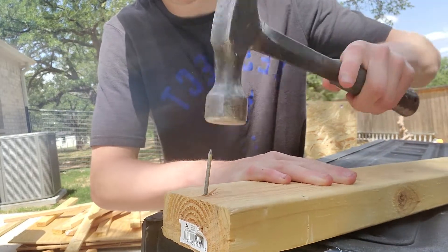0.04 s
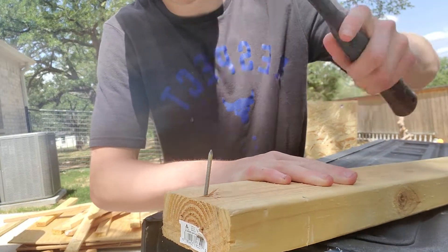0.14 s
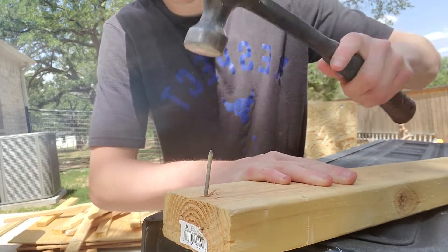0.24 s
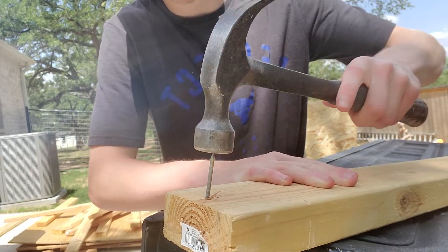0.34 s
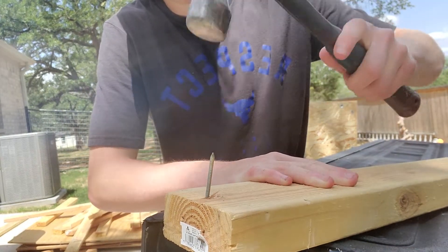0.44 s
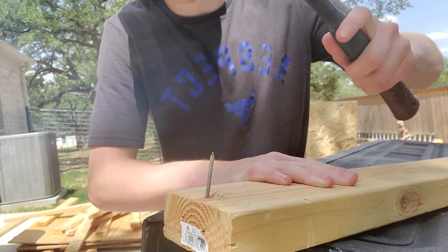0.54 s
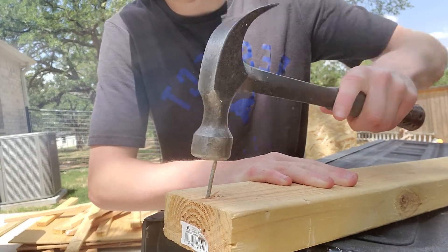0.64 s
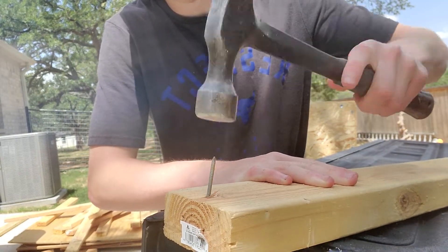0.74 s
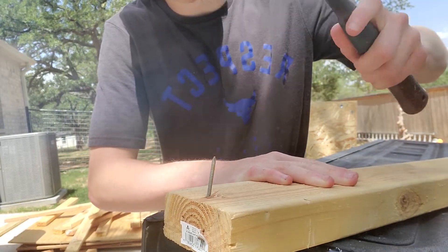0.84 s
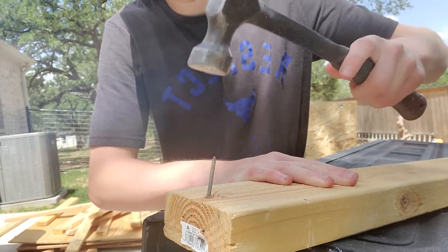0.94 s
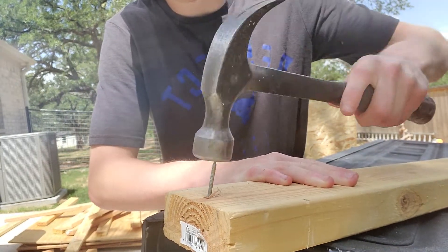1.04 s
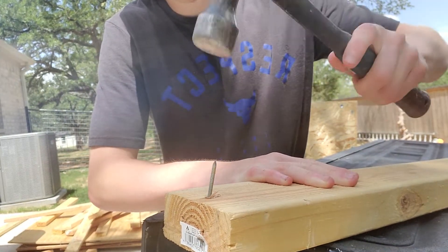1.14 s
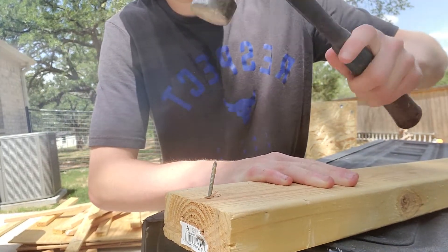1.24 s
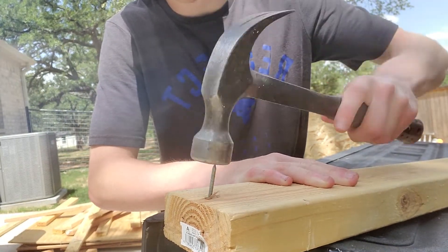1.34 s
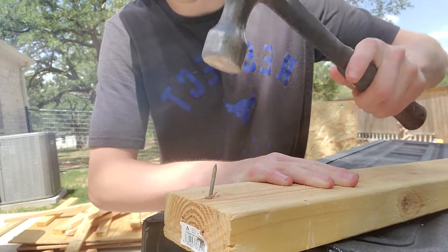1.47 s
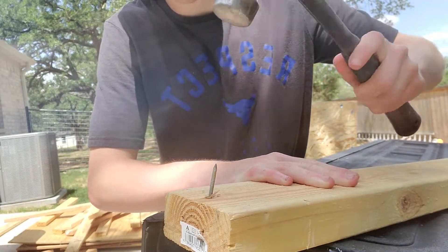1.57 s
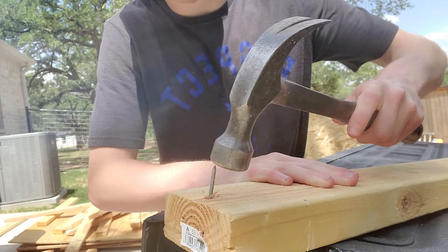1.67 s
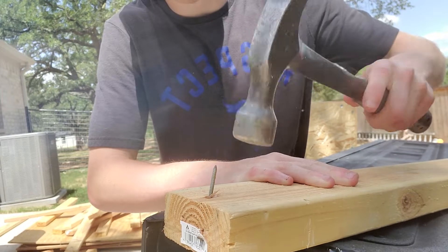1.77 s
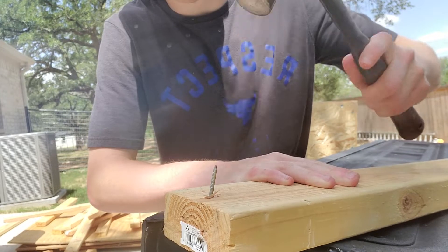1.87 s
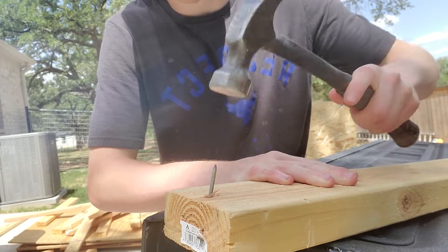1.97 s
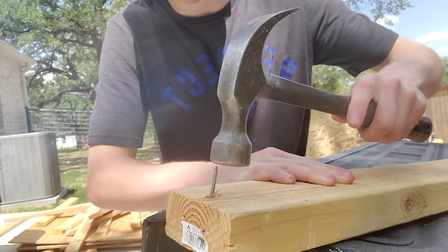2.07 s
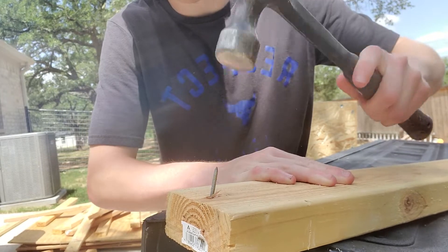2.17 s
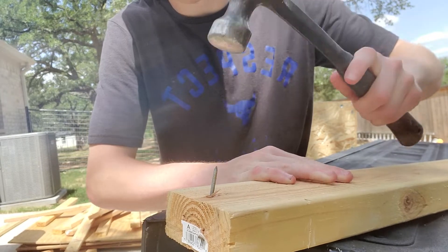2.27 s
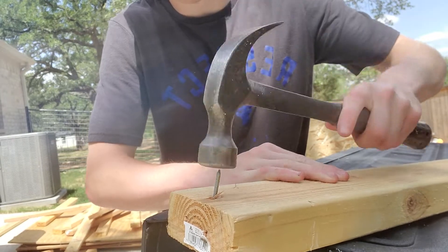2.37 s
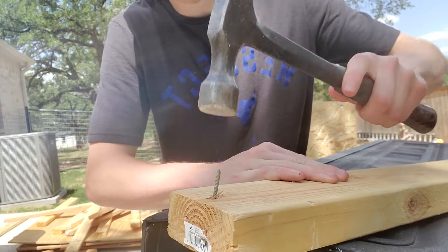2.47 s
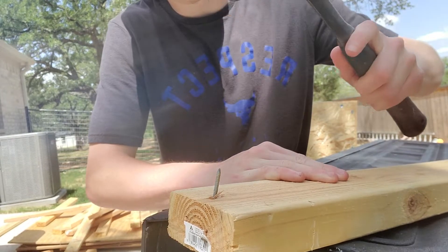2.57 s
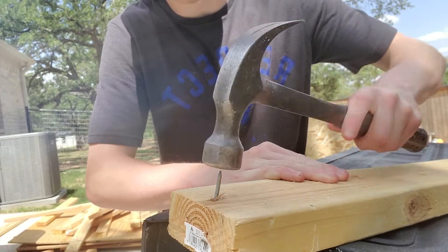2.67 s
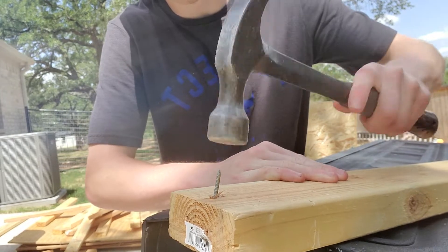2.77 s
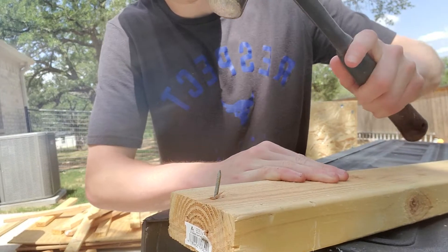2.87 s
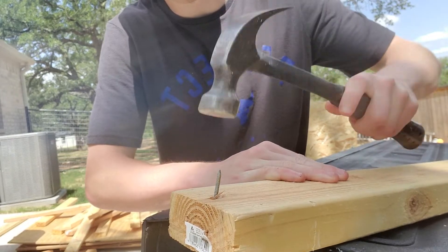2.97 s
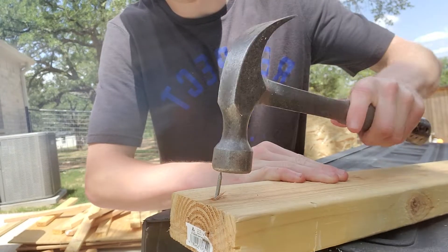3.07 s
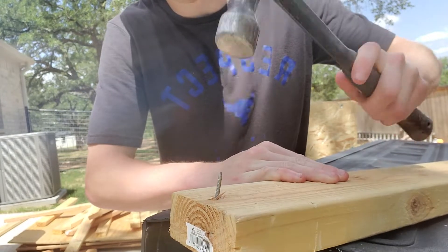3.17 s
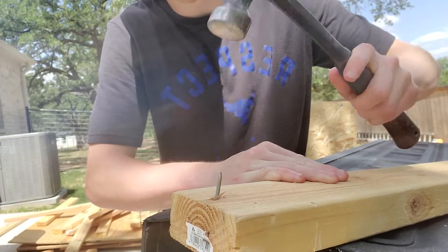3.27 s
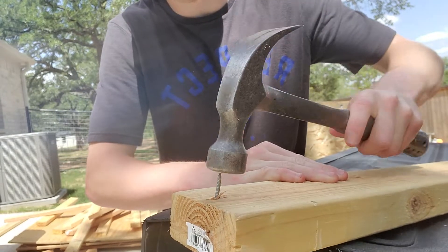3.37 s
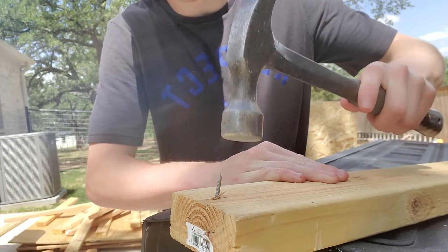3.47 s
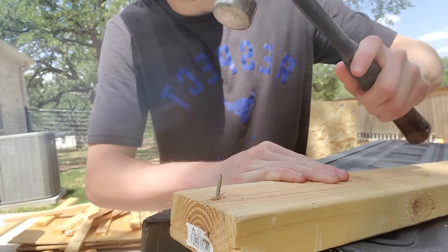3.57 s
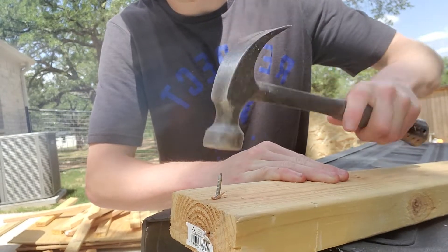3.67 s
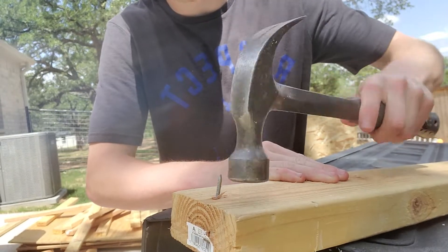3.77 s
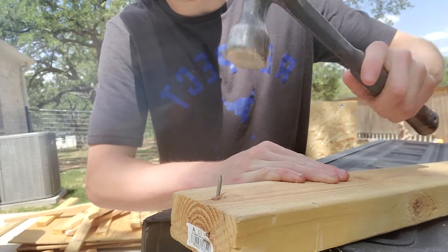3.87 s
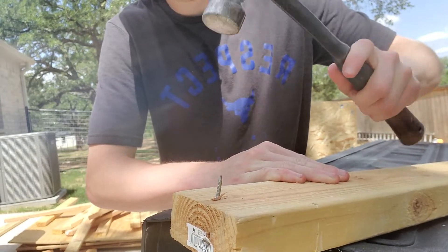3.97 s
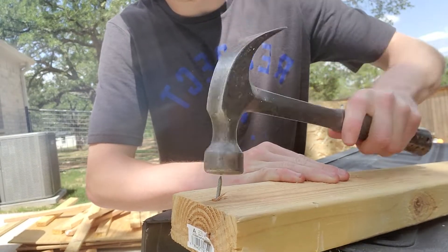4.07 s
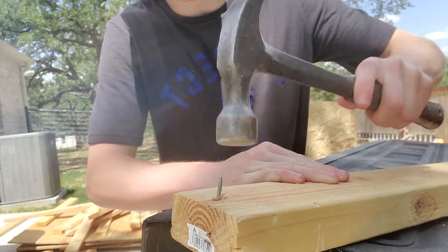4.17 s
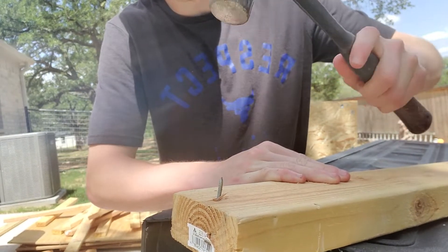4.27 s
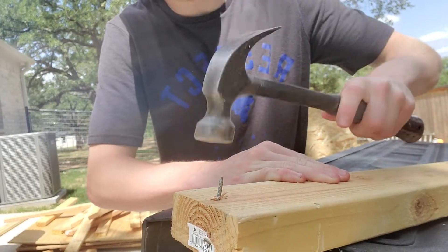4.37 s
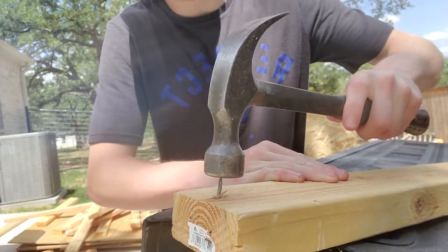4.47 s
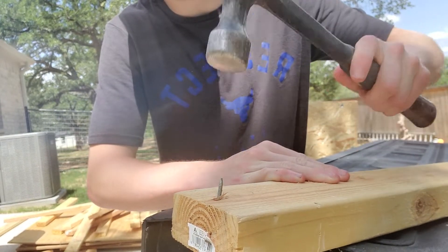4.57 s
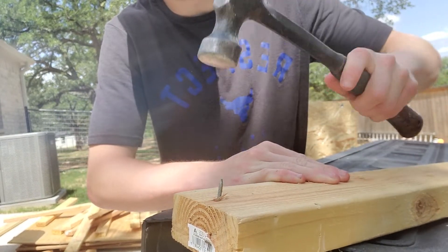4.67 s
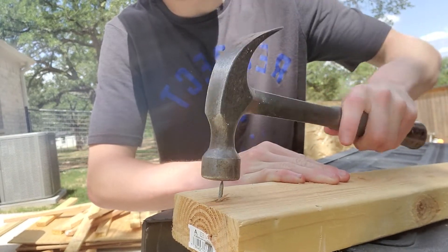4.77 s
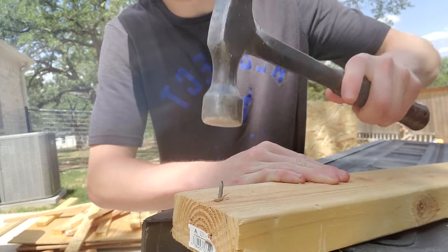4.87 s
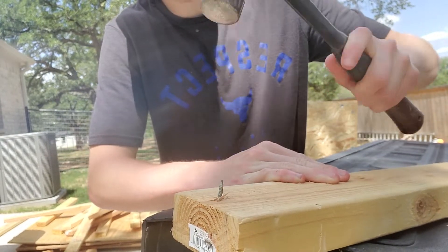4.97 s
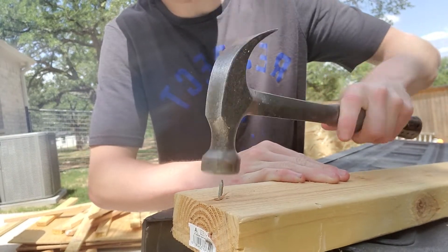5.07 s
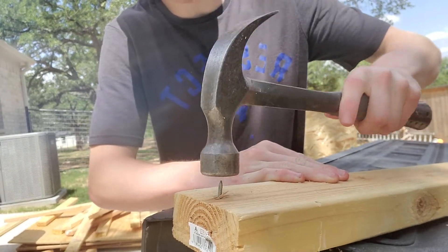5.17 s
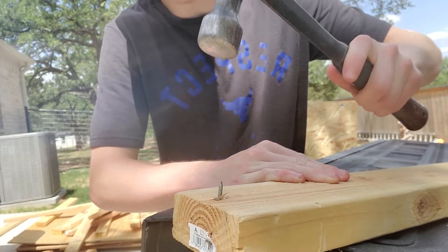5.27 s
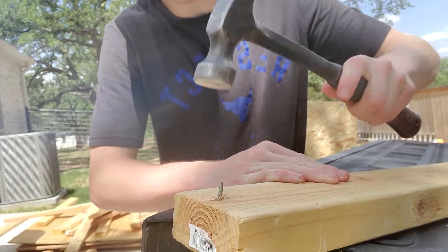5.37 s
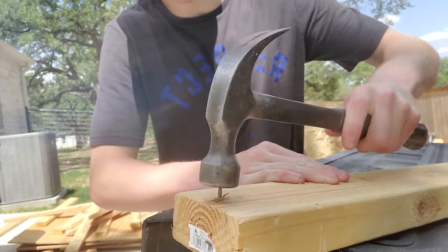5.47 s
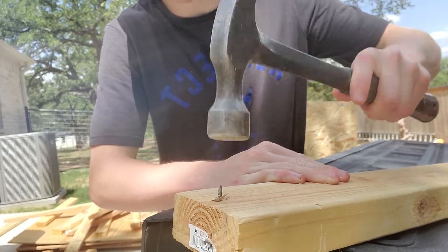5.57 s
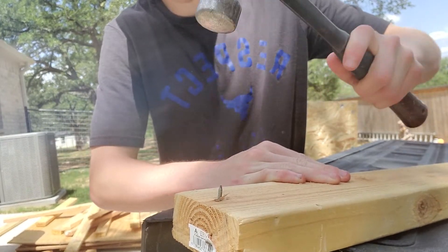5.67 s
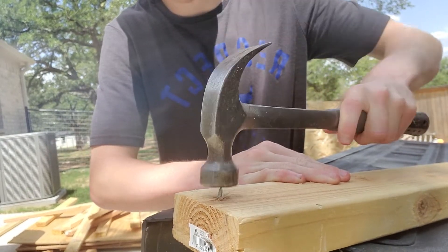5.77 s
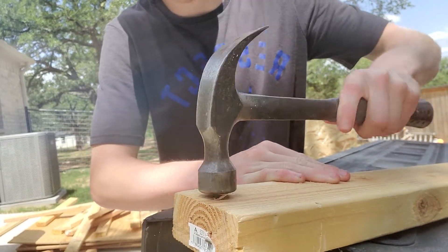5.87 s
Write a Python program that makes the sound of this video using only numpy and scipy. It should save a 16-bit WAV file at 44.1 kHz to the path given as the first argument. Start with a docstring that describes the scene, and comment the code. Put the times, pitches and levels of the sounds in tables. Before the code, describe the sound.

A steel hammer strikes a nail in a wooden board in steady, sharp blows, thumping a hollow plastic bin underneath, outdoors.

```python
"""A steel hammer drives a nail back out of a pine board in eighteen blows, close by in a yard.
Each blow clicks, cracks, pings the ever shorter nail and thumps the board. The board lies on a hollow
plastic bin, which shudders and booms. It settles with two small taps, and after many blows it hops
and clatters back onto the lid. Fence and house echo the work. Behind it an air conditioner hums
and leaves hiss, with a faint bird, an insect and one small tick."""
import sys
import numpy as np
from scipy import signal
from scipy.fft import rfft, irfft, next_fast_len
from scipy.io import wavfile
from scipy.ndimage import uniform_filter1d, minimum_filter1d

SR = 44100
rng = np.random.default_rng(int(sys.argv[2]) if len(sys.argv) > 2 else 0)


def generate_wav(sig):
    """Save sig (samples, or channels by samples) to the path in sys.argv[1] as 16-bit PCM at SR."""
    pcm = np.round(np.clip(np.atleast_2d(sig).T, -1, 1) * 32767).astype(np.int16)
    wavfile.write(sys.argv[1], SR, pcm)


N = 261513
RING = np.arange(SR) / SR  # one second of time for a sound to ring out

# The bright tone of a hard contact. Each row: frequency in Hz, level in dB.
CLICK_TONE = [(2000, -9), (5000, -18), (6800, -1), (7600, 3), (9400, 10.5), (10500, 5.5), (13000, 4),
              (15300, 0), (16500, -20)]


def amp(db):
    return 10 ** (np.asarray(db) / 20)


def value_at(points, hz):
    """Reads between the rows of a table that starts with a frequency column."""
    frequencies, values = np.transpose(points)
    return np.interp(np.log(hz + 1), np.log(frequencies), values)


def unit(x, seconds=None):
    """Scales a sound to an average (rms) level of 1, judged by its first seconds if given."""
    head = x if seconds is None else x[:max(8, int(seconds * SR))]
    return x / np.sqrt(np.mean(head ** 2) + 1e-20)


def add(mix, start, sound):
    part = mix[max(0, round(start * SR)):][:len(sound)]
    part += sound[:len(part)]


def colour(x, tone):
    """Shapes the tone of a sound. Each row of tone: frequency in Hz, gain in dB."""
    size = next_fast_len(len(x) + 2048)
    gain = amp(value_at(tone, np.fft.rfftfreq(size, 1 / SR)))
    return irfft(rfft(x, size) * gain, size)[:len(x)]


def noise(tone, size=SR):
    return unit(colour(rng.standard_normal(size), tone))


def dying(fade_s):
    """A fade that falls by 60 dB in fade_s seconds; every fade time here means this."""
    return amp(-60 * RING / fade_s)


def rising(seconds):
    return 1 - np.exp(-RING / seconds)


def resonate(x, hz, width_hz):
    """Makes a sound ring around one pitch; at 0 Hz it only smooths it."""
    pole = np.exp((2j * np.pi * hz - np.pi * width_hz) / SR)
    return signal.lfilter([1 - abs(pole)], [1, -pole], x + 1e-18).real


def waver(size, width_hz):
    return unit(resonate(rng.standard_normal(size), 0, width_hz))


def sine(pitch_hz):
    return np.sin(2 * np.pi * np.cumsum(pitch_hz) / SR)


def ring(notes, detune, spread_db, lag_s):
    """The natural notes of a struck thing; pitch, level and timing vary a little with each blow."""
    out = np.zeros(SR)
    for k, (hz, db, fade_s) in enumerate(notes):
        pitch, level, late = rng.standard_normal(3)
        t = np.maximum(RING - lag_s * abs(late), 0)
        wave = np.sin(2 * np.pi * hz * (1 + detune * pitch) * t)
        out += (-1) ** k * amp(db + spread_db * level) * dying(fade_s) * wave
    return out


def air():
    """Steady outdoor rumble and leaf hiss."""
    # Each row: frequency in Hz, level in dB.
    air_tone = [(15, -11), (25, -42.5), (74, 12.5), (134, 17), (157, 7.5), (200, -15.5), (242, -15),
                (911, -22.5), (2550, -24.5), (2760, -23.5), (3080, -25), (4370, -29), (5140, -37.5),
                (7310, -58.5), (16000, -115)]
    return amp(-40) * noise(air_tone, size=N)


def air_conditioner():
    """A slightly wavering hum over a low rumble."""
    hum = unit(sine(182.5 + 0.7 * waver(N, width_hz=2.86)))
    rumble = unit(resonate(rng.standard_normal(N), hz=62, width_hz=14))
    return amp(-43) * hum + amp(-46.5) * rumble


def steel_click():
    """Steel meets steel and rings briefly, while the board goes on faintly tapping the lid."""
    taps = (rng.random(SR) < 110 / SR) * rng.standard_normal(SR)  # about 110 a second
    chatter = unit(colour(taps, CLICK_TONE)) + 0.56 * noise(CLICK_TONE)
    snap = noise(CLICK_TONE) * (np.exp(-RING / 0.0017) + 1.8 * dying(0.027))
    return unit(snap + amp(-40.5) * chatter * dying(0.52), 0.062)


def wood_crack(click_db):
    """The nail slips for a few milliseconds and the wood rings; a soft hit with little click is duller."""
    # The noise of the slip. Each row: frequency in Hz, level in dB.
    crack_tone = [(200, -22.5), (600, 7.5), (1000, -10.5), (1500, 3.5), (2700, -1.5), (3200, 1), (4300, 1),
                  (5500, -7.5), (6500, -8), (7400, -24.5), (16000, -44)]
    # The ringing wood. Each row: pitch in Hz, level in dB, fade time in seconds.
    wood_notes = [(860, -2, 0.05), (1216, -3, 0.04), (1940, -10, .04), (2217, 1.5, 0.045), (2900, 1, 0.02),
                  (1130, -1, 0.05), (1389, -11, 0.09), (1640, -1, 0.06), (2690, -9, 0.04), (4200, -9, 0.03)]
    slip = np.exp(-(RING / 0.0044) ** 2) + amp(-27) * dying(0.05)
    crack = unit(noise(crack_tone) * slip * rising(0.0004), 0.029)
    wood = ring(wood_notes, detune=0.0051, spread_db=4, lag_s=0.00098)
    wood = unit(wood * rising(0.00065), 0.0037)
    treble_db = 0.86 * np.clip(click_db + 9, -11, 0)
    return colour(unit(amp(-2) * crack + wood, 0.04), [(2500, 0), (3900, treble_db)])


def board_thump():
    """The board and the lid under it take up the push and ring low."""
    # Each row: pitch in Hz, level in dB, fade time in seconds.
    board_notes = [(162, -9, 0.65), (182.3, -14, 0.41), (200.5, 3, 0.31), (233.3, -7.5, 0.45),
                   (254.9, -12.5, 0.3), (291, -13, .47), (364, -20.5, 0.45), (441.5, -6.5, 0.14),
                   (516.4, -8.5, 0.072), (571, -13.5, 0.2), (590, -18, 0.3), (665.7, -13.5, .2),
                   (810, -12, 0.15)]
    board = ring(board_notes, detune=0.0038, spread_db=1.67, lag_s=0.00072)
    return unit(board * rising(0.0061), 0.056)


def lid_shudder():
    """The loose lid shakes under a blow."""
    # Each row: frequency in Hz, level in dB.
    shudder_tone = [(60, -13), (120, -9.5), (200, 7.5), (270, -2.5), (330, -3), (450, -4), (650, -9),
                    (1000, -18), (2500, -39.5)]
    return unit(noise(shudder_tone) * dying(0.32) * rising(0.012), 0.044)


def bin_boom():
    """The hollow of the bin swells into a deep boom."""
    # Each row: pitch in Hz, level in dB, fade time in seconds.
    bin_notes = [(60.1, 7, 0.69), (70.2, 7.5, 0.44), (80.26, 1.5, 0.89), (99.9, 4, 0.84), (123.5, 3, 0.69)]
    return unit(ring(bin_notes, detune=0.021, spread_db=0, lag_s=0.008) * rising(0.054), 0.29)


def nail_ping(start):
    """The nail's free end rings, damped by the wood: higher as it shortens, loudest while it is loose."""
    # Each row: time in seconds, pitch in Hz, level in dB.
    nail_course = [(0.35, 3080, -46), (1.04, 4000, -17), (1.38, 4213, -18), (1.71, 5900, -27.5),
                   (2.4, 6210, -36), (5.85, 6180, -33)]
    times, pitches, levels = np.transpose(nail_course)
    hz, db = np.interp(start, times, pitches), np.interp(start, times, levels)
    bend = 1 + 0.0053 * np.exp(-RING / 0.0036)  # the ping starts slightly sharp
    return amp(db) * unit(np.sin(2 * np.pi * hz * RING * bend) * dying(0.024), 0.03)


def clack(clack_db, edge_db, length_s, bounces=3, size=12000):
    """The board lands and bounces quickly, ringing the plastic lid; a click adds a bright edge."""
    # The ringing lid. Each row: pitch in Hz, width of the resonance in Hz, level in dB.
    lid_notes = [(439, 31, -1.5), (853, 69, -2), (1190, 94, 0), (1460, 50, -10), (1128, 26, 2.5),
                 (1632, 19, 6.5), (2163, 34, -2), (2790, 140, -3.5), (3350, 56, -12), (4170, 120, -4.5),
                 (4940, 99, -14)]
    # The noise of the contact. Each row: frequency in Hz, level in dB.
    knock_tone = [(150, -19), (400, 18), (900, 3.5), (1700, 11), (3000, 5.5), (4500, -0.5), (6300, -21),
                  (7500, -25), (16000, -54)]
    strikes = np.zeros(size)
    times = np.r_[0, (np.arange(bounces) + rng.uniform(0.6, 1.4, bounces)) * length_s / bounces]
    np.add.at(strikes, (times * SR).astype(int), np.r_[1, rng.uniform(0.45, 0.9, bounces)])
    contacts = rng.standard_normal(size) * resonate(strikes, 0, 300)  # scrapes of about a millisecond
    lid = sum(amp(db) * unit(resonate(contacts, hz, width), 0.05) for hz, width, db in lid_notes)
    knock = unit(colour(contacts, knock_tone), length_s)
    body = unit(unit(lid, length_s) + amp(2.5) * knock, length_s)
    edge = unit(colour(contacts, CLICK_TONE), 2 * length_s)
    return amp(clack_db) * body + amp(edge_db) * edge


def hammering():
    """Plays all blows, taps and landings; returns that work and, apart from it, the nail's pings."""
    # Each row: start in seconds, force in dB, then steel click and board thump in dB above the force.
    blows = [(0.0116, -20, -23.5, 5), (0.352, -16.5, -15.5, 1.5), (0.6943, -19.5, -9, -2),
             (1.0412, -22.5, -2.5, 0.5), (1.3765, -19.5, -4, 0.5), (1.7123, -18, -9.5, 0.5),
             (2.0641, -17.5, -6, 2), (2.3965, -20.5, -5.5, 3.5), (2.7466, -19.5, -6, 2.5),
             (3.0817, -20, -7, 2), (3.4229, -19, -7, 3), (3.7663, -19, -10, 2.5), (4.1269, -19, -7.5, 2),
             (4.4678, -19.5, -6.5, 0), (4.8075, -20, -8.5, 1), (5.1534, -19.5, -7.5, 1.5),
             (5.4925, -21.5, -7, 2), (5.847, -25.5, -2.5, 4)]
    # Two taps after a blow. Each row: delay in seconds, then clack and edge in dB above the force.
    settling_taps = [(0.058, -18.5, -29), (0.101, -36, -40.5)]
    # The board lands after a hop.
    # Each row: start in seconds, clack in dB, edge in dB, rebound in dB above the clack.
    landings = [(0.724, -17.5, -23.5, -4.5), (2.428, -11.5, -31, -4.5), (2.808, -24, -43.5, -8.5),
                (3.107, -21.5, -28.5, 6), (3.463, -16.5, -37, -11.5), (3.796, -20, -44.5, -5),
                (4.155, -20, -39, 3), (4.494, -12.5, -27.5, -3.5), (4.834, -12.5, -26, -2.5),
                (5.179, -16, -23, 0.5), (5.519, -17, -26, 2), (5.853, -11.5, -43, -9)]
    work, nail = np.zeros((2, N))
    for start, force_db, click_db, thump_db in blows:
        hit = amp(click_db) * steel_click() + wood_crack(click_db) + amp(thump_db) * board_thump()
        shudder_db = -23.5 - 0.2 * click_db  # a square hit clicks more and shakes the lid less
        boom_db = -29 - 1.08 * start  # the boom weakens as the work goes on
        add(work, start, amp(force_db) * hit + amp(shudder_db) * lid_shudder() + amp(boom_db) * bin_boom())
        add(nail, start, nail_ping(start))
        for delay, clack_db, edge_db in settling_taps:
            late_s, tap_db = rng.normal(0, 0.002), rng.normal(force_db, 4)
            tap = clack(tap_db + clack_db, tap_db + edge_db, length_s=0.0045)
            add(work, start + delay + late_s, tap)
    for start, clack_db, edge_db, rebound_db in landings:
        add(work, start, clack(clack_db, edge_db, length_s=0.003))
        add(work, start + 0.011, clack(clack_db + rebound_db, edge_db - 5.5, length_s=0.0045))
    return work, nail


def near_echoes(x):
    """The first echoes off board, lid and body, different at each microphone."""
    out = np.zeros(N)
    for delay in rng.uniform(0.00073, 0.0083, size=6):
        add(out, delay, rng.choice([-1, 1]) * x)
    return colour(out, [(300, -39), (1000, -10.5), (3000, -13), (8000, -23)])


def yard_tail():
    """Scattered echoes off wall, fence and trees; the low ones last longest."""
    # Each row: frequency in Hz, fade time in seconds.
    fade_times = [(100, 0.69), (450, 0.37), (1100, 0.24), (3000, 0.28), (7000, 0.27), (15000, 0.21)]
    echoes = rng.standard_normal(SR) * (rng.random(SR) < 5000 / SR)
    hz, t, bands = signal.stft(echoes, SR, nperseg=256)
    bands = bands * amp(-60 * t / value_at(fade_times, hz)[:, None])
    tail = signal.istft(bands, SR, nperseg=256)[1][:SR] * rising(0.0043) ** 2
    return tail / np.linalg.norm(tail)


def yard(x, tails=3):
    """The yard's echo of the blows, blended from three scattered tails so its tone stays even."""
    # The strength of the echo. Each row: frequency in Hz, gain in dB.
    echo_tone = [(60, -15.5), (200, -10.5), (300, -0.5), (450, -8), (1000, -9.5), (2000, -8.5),
                 (4000, -11.5), (7000, -11.5), (15000, -15)]
    shares = np.cos(np.pi * (0.7 * np.arange(N) / SR + np.arange(tails)[:, None] / tails)) ** 4
    shares /= np.linalg.norm(shares, axis=0)
    return colour(sum(signal.oaconvolve(x * share, yard_tail())[:N] for share in shares), echo_tone)


def bird():
    """Faint, slightly rough notes that fall in pitch."""
    # Each row: start in seconds, level in dB.
    calls = [(.19, -57), (.59, -59), (2.65, -58.5), (5.4, -61.5)]
    out, size = np.zeros(N), int(0.11 * SR)
    for start, db in calls:
        pitch_hz = np.linspace(3600, 2850, size) + 230 * waver(size, width_hz=250)
        add(out, start, amp(db) * np.hanning(size) * sine(pitch_hz))
    return out


def insect(hz=5000, pulse_s=0.32, dip_db=-13.5):
    """A thin whistle from the trees that swells and fades in slow pulses."""
    # Each row: start in seconds, length in seconds, level in dB.
    bouts = [(0.698, 1.2, -61.5), (3.798, 2.1, -71)]
    out = np.zeros(N)
    for start, length, db in bouts:
        t = np.arange(0, length, 1 / SR)
        whistle = sine(hz + 12 * waver(len(t), width_hz=40))
        pulses_db = dip_db * np.cos(np.pi * t / pulse_s) ** 2
        add(out, start, amp(db + pulses_db) * signal.windows.tukey(len(t), 0.25) * whistle)
    return out


def tick():
    """One small, bright tick."""
    hiss = resonate(rng.standard_normal(SR), hz=5600, width_hz=810) + 0.072 * noise(CLICK_TONE)
    return amp(-57) * unit(hiss * dying(0.0234), 0.0051)


def scene():
    """The work is near and to the right; the yard's echo and the air come from all round."""
    work, nail = hammering()
    near = work + nail + air_conditioner() + insect() + bird()
    add(near, 2.306, tick())
    samples = np.arange(N)
    left = np.interp(samples - 0.00015 * SR, samples, near) + near_echoes(work)  # arrives a little later
    right = near + near_echoes(work)
    carried = work + amp(-12) * nail  # the thin nail sends little sound into the yard
    shared = yard(carried) + air()
    width_tone = [(80, -22.5), (250, -9.5), (600, 2.5), (1500, 2.5), (6000, -2)]
    apart = colour(yard(carried) + air(), width_tone)  # the two sides differ little in the bass
    return np.array([left + amp(-2) * (shared + apart), right + amp(-5.5) * (shared - apart)])


def limiter(pair, ceiling_db, release_db_per_s):
    """Turns both channels down as soon as a peak passes the ceiling and lets go quickly."""
    over_db = np.maximum(20 * np.log10(abs(pair).max(0) + 1e-9) - ceiling_db, 0)
    fall = np.arange(N) * release_db_per_s / SR
    held_db = np.maximum.accumulate(over_db + fall) - fall
    return pair * amp(uniform_filter1d(minimum_filter1d(-held_db, size=41), size=41))


def record(dry):
    """The left microphone is shaded and duller; a limiter flattens the blows; the top treble is cut."""
    # The tone of both microphones. Each row: frequency in Hz, gain in dB.
    microphone_tone = [(20, -13), (38, -15.5), (56, 0), (6600, 2), (7400, -10), (8200, -9), (16000, -4.5)]
    # Each row: frequency in Hz, left level minus right level in dB.
    balance = [(60, -2.5), (250, -4.5), (600, -6.5), (1300, -5.5), (2500, -5.5), (4400, -7), (6500, -9.5),
               (7600, -14), (15000, -12)]
    hz, tilt_db = np.transpose(balance)
    right_db = -10 * np.log10((1 + amp(tilt_db) ** 2) / 2)  # keeps the total power the same
    sides = zip(dry, (right_db + tilt_db, right_db))
    pair = np.array([colour(colour(x, microphone_tone), np.c_[hz, db]) for x, db in sides])
    held = limiter(pair, ceiling_db=-1, release_db_per_s=900)
    treble_cut = signal.firwin(255, cutoff=16200, window=("kaiser", 9), fs=SR)
    return signal.oaconvolve(held, treble_cut[None], "same")


dry = scene()
out = record(dry)
generate_wav(out)
```